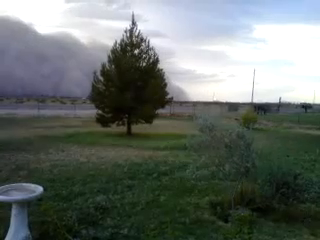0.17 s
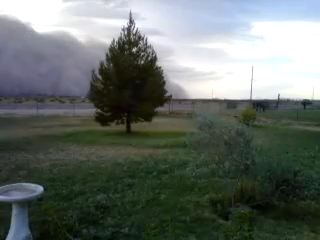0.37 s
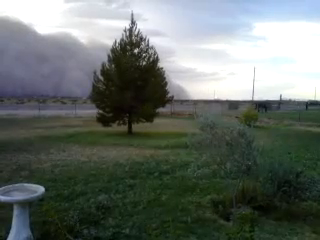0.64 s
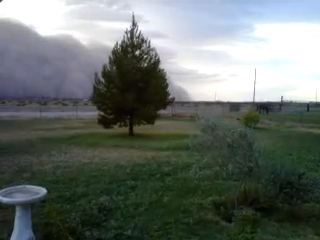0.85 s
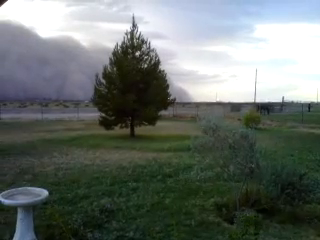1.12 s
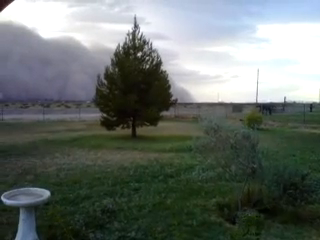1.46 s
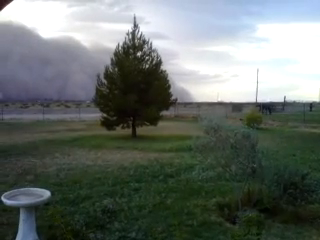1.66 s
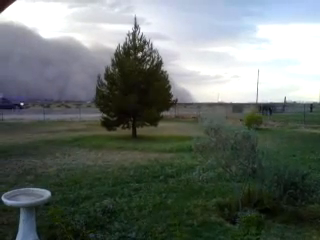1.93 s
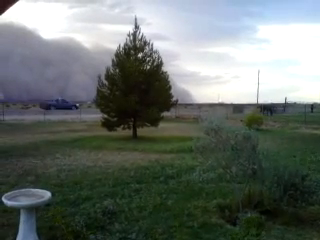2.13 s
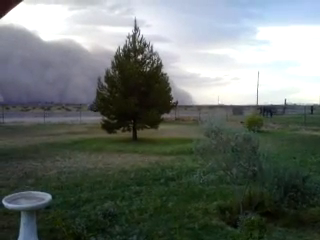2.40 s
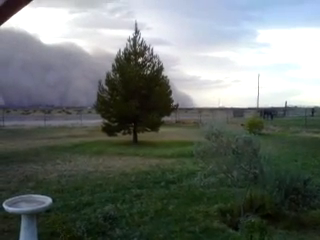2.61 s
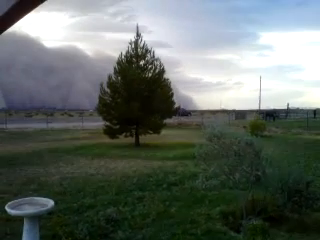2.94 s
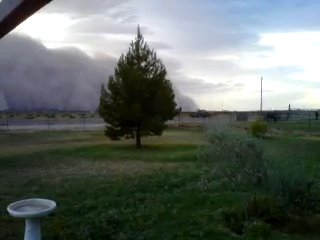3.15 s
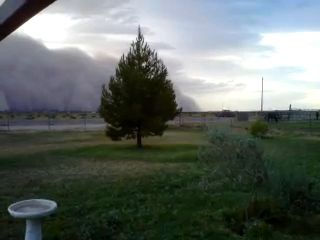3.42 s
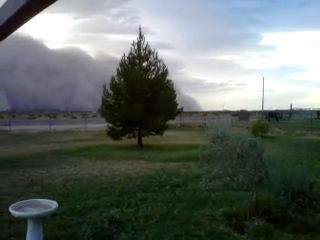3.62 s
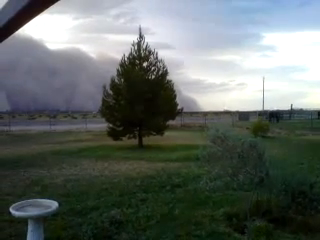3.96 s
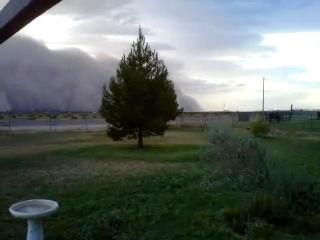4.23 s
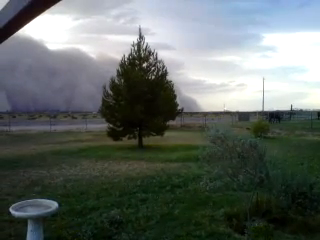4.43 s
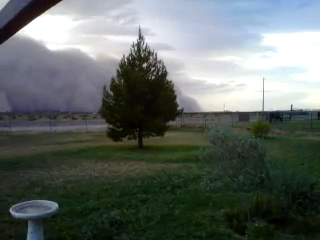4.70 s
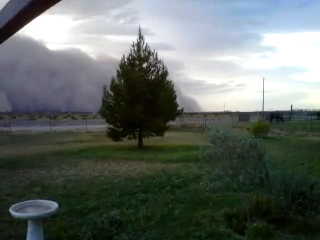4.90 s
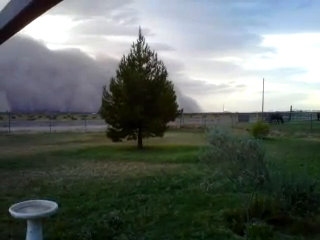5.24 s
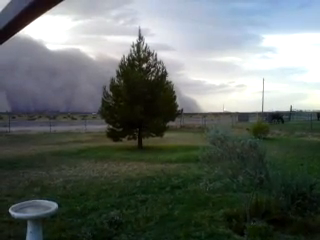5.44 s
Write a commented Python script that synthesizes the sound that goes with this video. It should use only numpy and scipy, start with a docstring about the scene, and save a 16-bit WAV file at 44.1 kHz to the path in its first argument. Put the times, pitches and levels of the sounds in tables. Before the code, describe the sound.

A V8 pickup approaches on a country road with a steady, slightly throbbing exhaust drone. It rasps as it passes, drops in pitch and fades, while its tyres swell into a whining roar that lingers. Heard from a lawn beside the road, with low wind on the microphone, a thin hiss, a few light knocks and faint chirps from a small bird.

```python
"""A lawn by a country road, on a breezy day. A V8 pickup drives past.
Its exhaust drones, sinks in pitch (Doppler and the engine easing) and fades; the pipe rasps.
Tyre tread roars and whines, swelling at the pass and lingering; an echo sweeps a comb through the truck.
Behind it: thin hiss, wind on the microphone, faint knocks, a small bird.
Early on, one gust swells the rushing sounds and the whole level dips briefly."""
import sys
import numpy as np
from scipy import signal
from scipy.fft import rfft, irfft
from scipy.io import wavfile

SR = 44100
rng = np.random.default_rng(int(sys.argv[2]) if len(sys.argv) > 2 else 0)


def file_out(sig):
    """Save sig as 16-bit WAV at sys.argv[1]."""
    # one column per channel
    cols = np.atleast_2d(sig).T
    # limit, then scale
    lim = np.clip(cols, -1, 1)
    pcm = np.round(lim * 32767).astype(np.int16)
    wavfile.write(sys.argv[1], SR, pcm)


N = 245337
TIME_S = np.arange(N) / SR

CYLINDERS, FIRING_HZ, SAG_HZ_PER_S, PASS_FALL_SHARE = 8, 132.7, 1.356, 0.1115
ABREAST_S, PASSING_S = 2.28, 1.25  # PASSING_S: distance to the road / speed

# Strongest exhaust harmonics, firing note first: (order [multiple of engine cycle rate])
LEAD_ORDERS = (8, 11, 14, 16)
# Directivity per lead order: (coming [dB], abreast [dB], going [dB])
LEAD_FACING_DB = [(0.2, 3.5, -6), (-8, -9.5, -3), (-11, -9.5, -3.5), (-20, -17.5, 4.5)]
# Side orders from uneven firing: (order [-], lead order [-])
SIDE_PAIRS = [(5, 11), (6, 8), (7, 8), (9, 8), (12, 11), (13, 14), (15, 14), (17, 16), (18, 16), (19, 16)]
# Strength per side order: (level re lead [dB])
SIDE_RE_LEAD_DB = [-11.5, -28.5, -16, -21.5, -10.5, -4.5, -9.5, -12.5, -14, -16]
# Small wavers in engine pitch: (time [s], firing rate change [Hz])
PITCH_WAVER_HZ = [(0, 0.026), (.35, 1.035), (.65, -1), (1.25, -1.5), (1.65, 1.5), (2.5, -.6), (2.85, 1.5),
                  (3.15, -.6), (4, .6)]
# Pipe resonances: (frequency [Hz], gain [dB])
PIPE_GAIN_DB = [(300, 2), (370, 3), (430, 3.5), (560, -3.5), (680, -6), (880, 2.5), (1000, -1), (1400, -24)]
# Tread envelopes: (time [s], roar [dB], sizzle [dB])
TYRE_LEVELS_DB = [(0, -39, -61), (.3, -45.5, -62), (.85, -44.5, -62), (1.3, -43, -52), (2.35, -47.5, -57.5),
                  (2.65, -35.5, -47), (2.85, -33.5, -47), (3.03, -39.5, -51), (3.24, -39.5, -54),
                  (3.46, -36.5, -57.5), (3.98, -41.5, -51.5), (4.2, -45.5, -56), (5.56, -45, -59)]
# Envelopes: (time [s], level [dB])
DRONE_LEVEL_DB = [(0, -29), (1, -30), (2.05, -30.5), (2.25, -37.5), (2.6, -42.5), (3.3, -53), (4.2, -55.5),
                  (5.1, -55), (5.56, -58)]
RUSH_LEVEL_DB = [(0, -44.5), (1.05, -48), (1.55, -42.5), (2.1, -53), (2.75, -44.5), (3.25, -51.5),
                 (5.56, -59.5)]
HISS_LEVEL_DB = [(0.2, -67.5), (.75, -62), (1.45, -60.5), (2.3, -68), (2.4, -73.5), (2.72, -67.5),
                 (3.05, -74)]
WIND_LEVEL_DB = [(0, -50), (.55, -43), (.75, -44), (1.3, -53), (1.8, -49), (2.6, -48), (3.3, -53.5),
                 (4.5, -51.5), (5.55, -54)]
# Noise spectra: (frequency [Hz], relative density [dB])
ROAR_COMING_DB = [(450, -39), (620, -9.5), (780, -4), (950, 1), (1180, 4), (1410, 2), (1700, -10),
                  (1900, -21), (2470, -46), (4000, -110)]
ROAR_ABREAST_DB = [(450, -40.5), (660, -24), (790, -5.5), (950, -5), (1180, -2), (1380, 0), (1540, -4.5),
                   (1900, -14.5), (2470, -54.5), (4000, -110)]
ROAR_GOING_DB = [(450, -32), (640, -19), (780, -12), (930, -14.5), (1080, -6.5), (1330, 1), (1630, -6.5),
                 (1900, -17), (2470, -39), (4000, -110)]
ROAR_FAR_DB = [(450, -42), (620, -14.5), (810, -3), (940, -3.5), (1080, -2.5), (1420, -3), (1740, -9.5),
               (1900, -22.5), (2470, -52), (4000, -110)]
SIZZLE_SPECTRUM_DB = [(1500, -18), (1800, 1.5), (2000, -1.5), (2160, 1.5), (2380, -6.5), (2600, -14.5),
                      (3000, -20.5), (3600, -38.5), (4500, -59.5)]
RUSH_SPECTRUM_DB = [(60, -24.5), (110, 1.5), (200, 3.5), (310, 4.5), (430, -2), (520, -1.5), (630, -7.5),
                    (760, -7), (1000, -37.5)]
HISS_SPECTRUM_DB = [(2500, -20.5), (3200, -18.5), (3950, -6.5), (4300, 3.5), (4750, 1.5), (5600, -6),
                    (6600, -7), (7300, -26.5)]
AIR_SPECTRUM_DB = [(300, -1), (2500, -5.5), (3200, -1), (4500, 0), (5500, -3), (6800, -5.5), (7400, -12.5)]
WIND_SPECTRUM_DB = [(10, -18), (25, -2), (45, -9), (70, 0.5), (100, -4.5), (160, 0), (300, -21.5),
                    (600, -62)]
# Knocks and ticks: (time [s], level [dB], pitch [Hz], width [Hz], 60 dB decay [s])
KNOCK_EVENTS = [(.603, -30, 1246, 700, 0.07), (1.563, -31.5, 892, 395, 0.054),
                (3.532, -51, 2950, 785, 0.014), (5.006, -40.5, 536, 130, .08),
                (5.158, -39.5, 640, 276, 0.061)]
# Bird: (start [s], length [s], first pitch [Hz], last pitch [Hz], spread [Hz], level [dB])
BIRD_CHIRPS = [(0.764, 0.071, 4370, 4310, 360, -57), (3.779, 0.16, 5020, 4770, 643, -68),
               (3.905, .035, 3730, 4570, 111, -62.5), (4.868, .12, 4700, 4400, 298, -79)]


def exhaust(cycles, level_db=-0.5, firing_shake=0.076, other_shake=0.15, shake_hz=9,
            slip_cycles=0.25, slip_hz=1.1):
    """Clean firing note among shakier orders; side orders slip against their lead: an uneven throb."""
    levels_db = {order: order_db(order, *facing) for order, facing in zip(LEAD_ORDERS, LEAD_FACING_DB)}
    phases = dict(zip(LEAD_ORDERS, rng.random(len(LEAD_ORDERS))))
    for (order, lead), db in zip(SIDE_PAIRS, SIDE_RE_LEAD_DB):
        levels_db[order] = levels_db[lead] + db
        phases[order] = phases[lead] + slip_cycles * waver(slip_hz)
    out = np.zeros(N)
    for order, db in levels_db.items():
        shake = firing_shake if order == CYLINDERS else other_shake
        angle = 2 * np.pi * (order * cycles + phases[order])
        tone = (1 + shake * waver(shake_hz)) * np.cos(angle) + shake * waver(shake_hz) * np.sin(angle)
        out += np.sqrt(2) * gain(db + level_db) * tone
    return out


def order_db(order, coming_db, abreast_db, going_db, echo_share=0.78):
    """Level of one order: shifts from front to rear, swells and cancels against its echo."""
    hz = firing_hz() * order / CYLINDERS
    comb = abs(1 + echo_share * np.exp(-2j * np.pi * hz * echo_lag_s()))
    facing_db = np.interp(bearing(), [-1, 0, 1], [coming_db, abreast_db, going_db])
    return curves(DRONE_LEVEL_DB)[0] + facing_db + 20 * np.log10(comb)


def firing_hz():
    """Firing rate as heard: falls through the pass (Doppler and the engine easing), sags, wavers."""
    pass_fall = 1 - PASS_FALL_SHARE * bearing()
    return FIRING_HZ * pass_fall - SAG_HZ_PER_S * (TIME_S - ABREAST_S) + curves(PITCH_WAVER_HZ)[0]


def bearing():
    """Sine of the truck's bearing: -1 coming, 0 abreast, 1 going."""
    along = (TIME_S - ABREAST_S) / PASSING_S
    return along / np.hypot(1, along)


def pipe_rasp(cycles, near_db=3, far_db=-8, nearest_s=2.3, spread_s=0.77):
    """High orders ring in the pipe while the truck is near, each swelling and fading."""
    coarse_s = TIME_S[::512]
    cycle_hz = np.gradient(cycles)[::512] * SR
    out = np.zeros(N)
    for order in range(20, 76):
        fade_hz = rng.uniform(0.45, 1.644)
        fading = 1 + np.sin(2 * np.pi * (fade_hz * coarse_s + rng.random()))
        resonance = gain(spectrum_db(PIPE_GAIN_DB, order * cycle_hz))
        envelope = np.interp(TIME_S, coarse_s, fading * resonance)
        out += envelope * np.cos(2 * np.pi * (order * cycles + rng.random()))
    nearness = 1 / (1 + ((TIME_S - nearest_s) / spread_s) ** 2)
    return gain(curves(RUSH_LEVEL_DB)[0] + far_db + (near_db - far_db) * nearness) * evened(out)


def gas_rush(cycles, level_db=-2, throb_depth=0.29, gust_db=2):
    """Low gas and body noise, throbbing once per engine cycle."""
    envelope = gain(curves(RUSH_LEVEL_DB)[0] + level_db + gust_db * gust())
    throb = 1 + throb_depth * np.cos(2 * np.pi * cycles)
    return envelope * throb * noise(RUSH_SPECTRUM_DB)


def tyres(cycles, level_db=-1.5, whine_db=-10, overtone_db=-6, flutter_db=1, flutter_hz=14,
          gust_roar_db=7, gust_sizzle_db=9):
    """Tread roar changes colour through the pass; the whine is brighter from behind."""
    stages_s = [1.6, 2.7, 2.95, 3.3, 3.6, 4.3]
    crossfades = [(ROAR_COMING_DB, (1, 0, 0, 0, 0, 0)), (ROAR_ABREAST_DB, (0, 1, 1, 0, 0, 0)),
                  (ROAR_GOING_DB, (0, 0, 0, 1, 1, 0)), (ROAR_FAR_DB, (0, 0, 0, 0, 0, 1))]
    roar = sum(np.sqrt(np.interp(TIME_S, stages_s, power)) * noise(spectrum)
               for spectrum, power in crossfades)
    roar = turbulence(roar + gain(whine_db) * tread_whine(cycles, harmonic=1))
    overtone_gain = gain(overtone_db) * np.interp(TIME_S, [2.9, 3.5, 4.1, 4.8], [0.21, 1, 1, 0.016])
    sizzle = turbulence(noise(SIZZLE_SPECTRUM_DB) + overtone_gain * tread_whine(cycles, harmonic=2))
    roar_db, sizzle_db = curves(TYRE_LEVELS_DB)
    roar *= gain(roar_db + gust_roar_db * gust())
    sizzle *= gain(sizzle_db + gust_sizzle_db * gust())
    return (roar + sizzle) * gain(level_db + flutter_db * waver(flutter_hz))


def tread_whine(cycles, harmonic, blocks_per_cycle=72.7, width_hz=35):
    """Fuzzy tone of the tread blocks, locked to the engine's falling pitch."""
    angle = 2 * np.pi * harmonic * blocks_per_cycle * cycles
    return evened(waver(width_hz) * np.cos(angle) + waver(width_hz) * np.sin(angle))


def with_echo(x, share):
    """One reflection off the surroundings: a slowly sweeping comb."""
    echo = np.interp(TIME_S - echo_lag_s(), TIME_S, x)
    return (x + share * echo) / np.hypot(1, share)


def echo_lag_s(longest_s=0.0095, peak_at_s=1.99, grow_s=1.48, shrink_s=0.99):
    """The lag grows as the truck nears, shrinks as it leaves."""
    since_s = TIME_S - peak_at_s
    return longest_s / np.hypot(1, since_s / np.where(since_s < 0, grow_s, shrink_s))


def turbulence(x, depth_db=1.68):
    """Turbulent air briefly lifts and drops patches of the spectrum."""
    bins = signal.stft(x, nperseg=1024)[2]
    patch_shape = np.outer(np.hanning(9), np.hanning(15))
    patches = signal.fftconvolve(rng.standard_normal(bins.shape), patch_shape, "same")
    bins *= gain(depth_db * evened(patches))
    return evened(signal.istft(bins, nperseg=1024)[1][:N])


def gust(start_s=0.27, attack_s=0.19, hold_s=0.31, release_s=0.088):
    """Strength of the one gust, 0 to 1."""
    return np.interp(TIME_S, np.cumsum([start_s, attack_s, hold_s, release_s]), [0, 1, 1, 0])


def hiss(cycles, air_db=-71, pulse_depth=0.048, threshold_db=-72, flicker_db=1.8, flicker_hz=7, gust_db=6):
    """Flickering high hiss, pulsed by the firing, sinking into steady air noise."""
    power = gain(curves(HISS_LEVEL_DB)[0] + gust_db * gust()) ** 2
    envelope = np.sqrt(np.maximum(power - gain(threshold_db) ** 2, 0))
    pulse = 1 + pulse_depth * np.cos(2 * np.pi * CYLINDERS * cycles)
    flicker = gain(flicker_db * waver(flicker_hz))
    return envelope * pulse * flicker * noise(HISS_SPECTRUM_DB) + gain(air_db) * noise(AIR_SPECTRUM_DB)


def wind(lumps_db=2, lumps_hz=7):
    """Lumpy low rumble of air at the microphone."""
    return gain(curves(WIND_LEVEL_DB)[0] + lumps_db * waver(lumps_hz)) * noise(WIND_SPECTRUM_DB)


def knocks(attack_s=0.0004):
    """Short dying bursts, each in one broad resonance."""
    out = np.zeros(N)
    for start_s, db, hz, width_hz, t60_s in KNOCK_EVENTS:
        age_s = np.maximum(TIME_S - start_s, 0)
        ring = sine(hz + width_hz / 2 * waver(width_hz))
        out += gain(db - 60 * age_s / t60_s) * (1 - np.exp(-age_s / attack_s)) * ring
    return out


def bird(roughness_hz=400):
    """Distant chirps: one arch of level each, on a raspy pitch glide."""
    out = np.zeros(N)
    for start_s, length_s, first_hz, last_hz, spread_hz, db in BIRD_CHIRPS:
        progress = np.clip((TIME_S - start_s) / length_s, 0, 1)
        hz = first_hz + (last_hz - first_hz) * progress + spread_hz * waver(roughness_hz)
        out += np.sqrt(2) * gain(db) * np.sin(np.pi * progress) * sine(hz)
    return out


def level_dip(start_s=0.615, fall_s=0.0033, hold_s=0.11, recover_s=0.11,
              before_db=0.5, dip_db=-5.5, after_db=1):
    """Gain curve: the level dips briefly."""
    corners_s = np.cumsum([start_s, fall_s, hold_s, recover_s])
    return gain(np.interp(TIME_S, corners_s, [before_db, dip_db, dip_db, after_db]))


def gain(db):
    """Decibels to amplitude."""
    return 10 ** (np.asarray(db) / 20)


def evened(x):
    """Scaled to rms 1."""
    return x / np.sqrt(np.mean(x ** 2) + 1e-20)


def sine(hz):
    """Tone of varying pitch."""
    return np.sin(2 * np.pi * np.cumsum(hz) / SR)


def curves(rows):
    """Table columns interpolated over time."""
    times_s, *columns = np.transpose(rows)
    return [np.interp(TIME_S, times_s, column) for column in columns]


def spectrum_db(points, hz):
    """Spectrum interpolated over log frequency."""
    points_hz, db = np.transpose(points)
    return np.interp(np.log(hz + 1), np.log(points_hz), db)


def waver(rate_hz):
    """Random motion, rms 1, low-passed at rate_hz."""
    hz = np.fft.rfftfreq(N, 1 / SR)
    return evened(irfft(rfft(rng.standard_normal(N)) / (1 + (hz / rate_hz) ** 4), N))


def noise(spectrum):
    """Steady shaped noise, rms 1."""
    hz = np.fft.rfftfreq(N, 1 / SR)
    return evened(irfft(rfft(rng.standard_normal(N)) * gain(spectrum_db(spectrum, hz)), N))


def scene():
    """Truck and background, mono; the echo is stronger for the low sounds."""
    cycles = np.cumsum(firing_hz()) / SR / CYLINDERS  # each cylinder fires once per cycle
    truck = exhaust(cycles)
    truck += with_echo(pipe_rasp(cycles) + gas_rush(cycles), share=0.33)
    truck += with_echo(tyres(cycles), share=0.29)
    return (truck + hiss(cycles) + wind() + knocks() + bird())[None]


def record(dry):
    """Level dip, then band limit."""
    edge_hz = 7250
    lowpass = signal.firwin(511, edge_hz, window=("kaiser", 9), fs=SR)
    return signal.oaconvolve(dry * level_dip(), lowpass[None], "same")


dry = scene()
out = record(dry)
file_out(out)
```